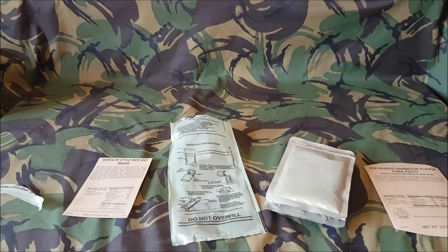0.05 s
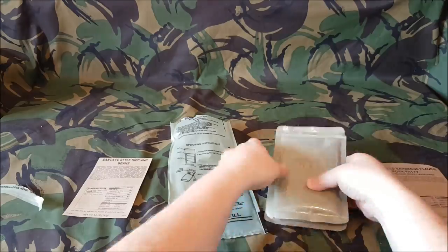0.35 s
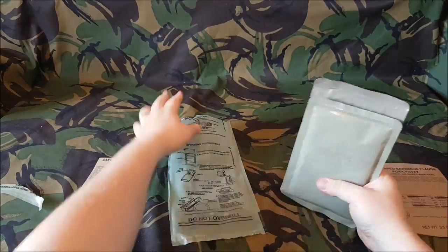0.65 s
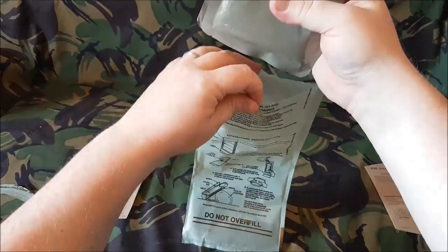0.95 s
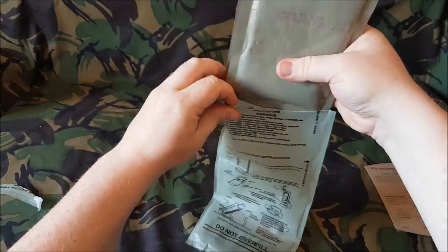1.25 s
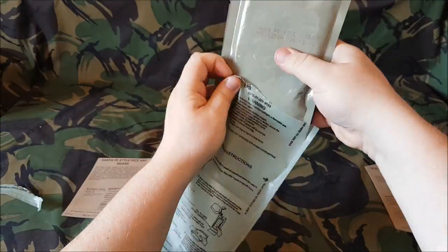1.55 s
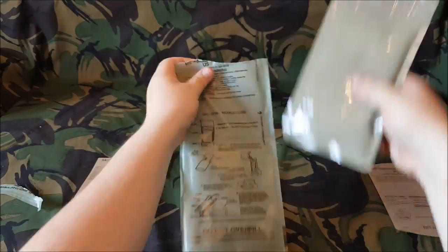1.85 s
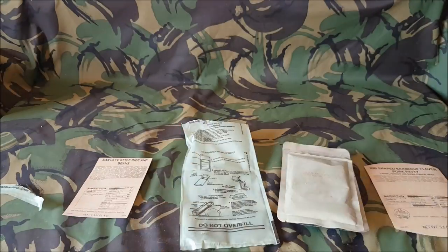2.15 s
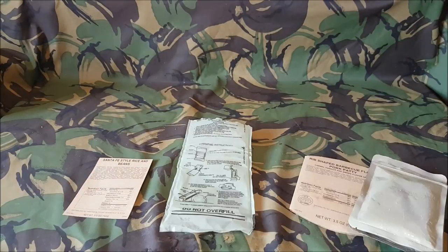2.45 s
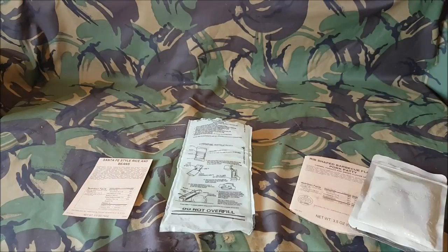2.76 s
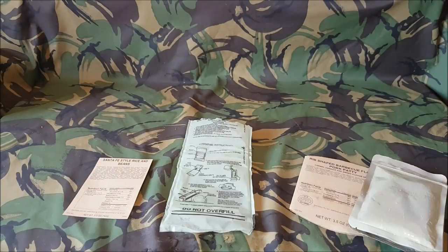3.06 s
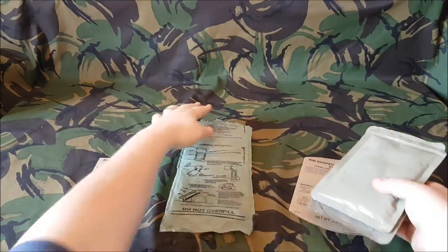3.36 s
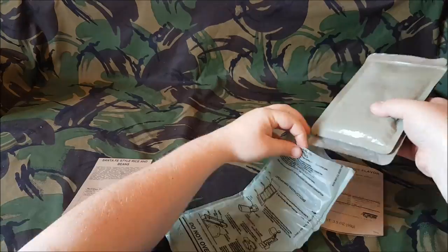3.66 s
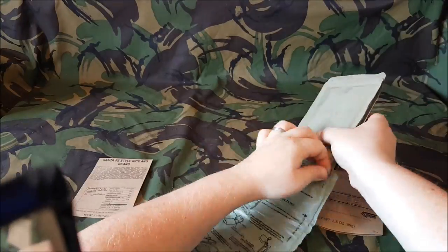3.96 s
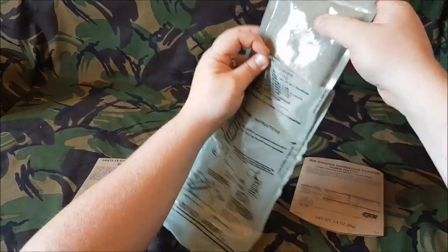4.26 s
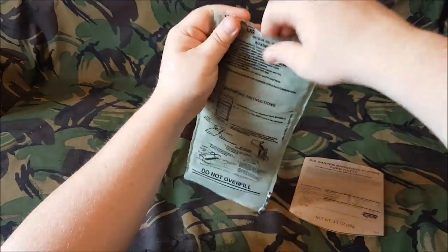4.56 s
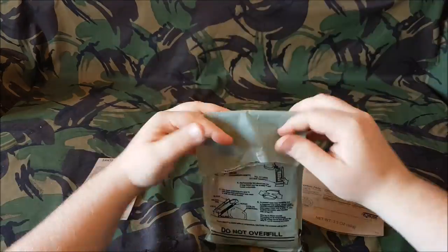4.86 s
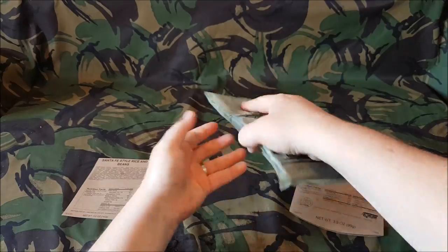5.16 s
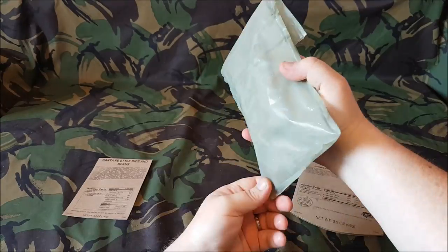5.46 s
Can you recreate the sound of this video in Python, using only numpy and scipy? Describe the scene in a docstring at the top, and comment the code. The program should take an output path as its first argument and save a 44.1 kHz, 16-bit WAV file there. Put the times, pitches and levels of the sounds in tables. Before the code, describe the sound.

A full foil food pouch knocks lightly on a cloth-covered table at about 0.2 seconds, swishes over the cloth and is tapped again as it is picked up around 0.5. From 0.7 to 2 seconds it is pushed into a thin plastic bag: a soft, bright rustle of tiny clicks, with short crumples and single snaps, strongest near 1.5. At 2.3 there is a soft dull bump, and the faint room hum drops abruptly to a quieter hiss. A few light crinkles and cloth swishes follow, then a near pause around 3 seconds. At 3.5 the crackling returns as the pouch is pushed in again. It is loudest and densest from about 4.1 to 5 seconds, surging as the bag is filled and folded. Last crumples come near 5.2 and fade by 5.5. Everything sounds close, in a small dry room.

```python
"""In a small dry room, at a cloth-covered table, a foil food pouch is picked up and pushed, twice, into a thin
plastic bag, which is then folded. The film buckles in tiny clicks: a soft rustle that surges with every push,
short crumples, and single snaps that each ring one facet. The full pouch knocks on the table and swishes over
the cloth. Underneath, the room tone hums faintly until 2.3 s, where a short low thump sounds and the background
drops abruptly to a quieter hiss."""
import sys
import numpy as np
from scipy import signal
from scipy.fft import rfft, irfft, next_fast_len
from scipy.io import wavfile
from scipy.ndimage import map_coordinates

SR = 44100
rng = np.random.default_rng(int(sys.argv[2]) if len(sys.argv) > 2 else 0)


def store_pcm(level_fs):
    """Save levels as 16-bit WAV."""
    pcm = np.round(np.clip(level_fs, -1, 1) * 32767).astype(np.int16)
    wavfile.write(sys.argv[1], SR, np.atleast_2d(pcm).T)


N = 243431
TIME = np.arange(N) / SR


# EQ curve of the thin film: f/Hz, level/dB
FILM_EQ = [(90, -32.5), (330, -14.5), (720, -5), (1150, -8), (1580, -2), (3900, -3.5), (7200, -1),
           (13000, -2), (16000, -14)]
def rustle(trims_db, slide_db, creases_db):
    """Film buckles under the fingers, with the odd sharper crease, over the hiss of sliding on foil."""
    slide = unit(colour(stereo_noise(N, 7300), FILM_EQ))
    creases = crackle(per_s=150, spread_db=2.4, cycles=2.6)
    buckling = crackle(per_s=600, spread_db=1, cycles=8.4)
    bunched = unit((buckling + undb(slide_db) * slide) * stick_slip(depth_db=5.3))
    bands = registers(bunched + undb(creases_db) * creases)
    gains = hand_effort()
    sound = sum(undb(db) * gain * band for db, gain, band in zip(trims_db, gains, bands))
    dull = shape(sound, lambda f: 1 / (1 + (f / 9820) ** 6))
    brightness = np.minimum(gains[-1] / undb(-59.5), 1) ** 0.166  # gentle handling loses the top
    return dull + brightness * (sound - dull)


# fader rides of the held film, one list a move (first push, laying down, filling and folding):
# t/s, treble level/dB, middle re treble/dB, body re middle/dB
HOLD_RIDES = [
    [(0.44, -75.5, 3.5, -9), (0.52, -66, -3, -4), (0.78, -73.5, 0.5, -3), (1.45, -65.5, -8, -2.5),
     (1.61, -78, 5.5, -6), (1.78, -70.5, -1, -0.5), (1.9, -72, -5.5, 1), (2.15, -66.5, -2.5, -4),
     (2.28, -85.5, 4.5, -10)],
    [(2.44, -69, 9.5, -21.5), (2.62, -88.5, -9, -24.5), (2.69, -81, -1, -2.5), (3.02, -73, -2.5, -3.5)],
    [(3.33, -73, 4.5, -24), (3.66, -56, -1, -24), (3.8, -60.5, -2, -9), (4.0, -63.5, 0, -11.5),
     (4.43, -64.5, -4.5, -4.5), (4.72, -46, -7, -4), (5.11, -68, 1.5, -9.5), (5.33, -62, -3, -10),
     (5.385, -76, -7, -2.5), (5.52, -70, -11, 3)],
]
# surges of a push or fold: t/s, length/s, treble level/dB, middle re treble/dB
PUSH_SURGES = [(0.826, 0.12, -62.5, -4.5), (1.013, 0.09, -67, -2), (1.172, 0.0406, -54.5, -2.5),
               (1.387, 0.057, -59.5, -2), (1.451, 0.1113, -49.5, -6), (1.64, 0.1386, -54.5, -3),
               (1.787, 0.0748, -61.5, -1.5), (2.061, 0.0575, -65.5, 2), (2.485, 0.1304, -60.5, -2),
               (3.656, 0.0232, -48, -6.5), (3.832, 0.0182, -51, -10.5), (4.053, 0.0544, -48.5, -8.5),
               (4.12, 0.15, -47, -6.5), (4.314, 0.0642, -41.5, -15), (4.48, 0.0767, -46, -9.5),
               (4.628, 0.0505, -49, -2), (4.755, 0.0716, -47, -5), (4.849, 0.17, -45.5, -12),
               (5.047, 0.0064, -42, -13.5), (5.171, 0.0473, -48.5, -10.5)]
def hand_effort(attack_s=0.0232, release_s=0.0131):
    """Body, middle and treble envelopes: each push rises, holds and lets go over the bed of holding."""
    times, *columns = np.concatenate(HOLD_RIDES).T
    hold_db, middle_db, body_db = (np.interp(TIME, times, column) for column in columns)
    held = sum((TIME > move[0][0]) & (TIME < move[-1][0]) for move in HOLD_RIDES)
    treble, middle = held * undb(hold_db), held * undb(hold_db + middle_db)
    for start, length_s, db, mid_db in PUSH_SURGES:
        attack = np.clip((TIME - start) / attack_s + .5, 0, 1)
        release = np.exp(-np.clip(TIME - start - length_s, 0, .5) / release_s)
        push = undb(db) * attack * release
        treble = np.hypot(treble, push)
        middle = np.hypot(middle, push * undb(mid_db))
    return middle * undb(body_db), middle, treble


# folds giving way: peak t/s, level/dB, middle re treble/dB, rise/ms
FOLD_CRUMPLES = [(0.001, -34, 1, 1.3), (0.258, -50, 10.5, 14.4), (0.498, -36.5, 2, 9.9),
                 (0.671, -30.5, -5, 4.46), (0.82, -34.5, -12, 3.2), (0.839, -36.5, -9, 3),
                 (0.902, -37.5, -7.5, 1.36), (0.948, -41.5, -6.5, 2.95), (1.057, -40.5, -10, 1.7),
                 (1.093, -38.5, -7.5, 8.9), (1.2, -35.5, -8.5, 14), (1.244, -35.5, -6.5, 3.6),
                 (1.278, -30, -8, 1.18), (1.512, -25.5, -5, 2.9), (1.721, -25, -5.5, 3.5),
                 (1.765, -42, -2, 3.6), (1.829, -37, -7.5, 1.17), (1.94, -34.5, -8.5, 0.51),
                 (1.973, -38.5, -4, 1.3), (2.013, -39.5, -0.5, 1.06), (2.429, -44.5, -2.5, 0.53),
                 (2.4449, -38, -21, 1), (2.537, -33.5, -17, 3.4), (2.57, -39, -6, 9),
                 (2.604, -46.5, -3, 2.4), (2.807, -44.5, -2, 1.18), (3.472, -27.5, -20.5, 3.33),
                 (3.52, -27, -18, 1.73), (3.582, -24.5, -19.5, 4.7), (3.834, -33.5, -5.5, 1.4),
                 (4.031, -29, -8.5, 2.55), (4.157, -19, -15.5, 3.12), (4.245, -28, -21.5, 0.98),
                 (4.334, -25, -6.5, 2.7), (4.459, -26.5, -11.5, 3.1), (4.505, -17, -15.5, 5.13),
                 (4.521, -23.5, -9.5, 7.1), (4.638, -22.5, -13.5, 13.6), (4.677, -19, -7.5, 12.3),
                 (4.76, -20, -15.5, 3.2), (4.812, -27.5, -8, 7.5), (4.885, -26, -13, 13.6),
                 (4.95, -23, -9, 2.86), (5.144, -24, -15, 9.16), (5.217, -26.5, -11, 15),
                 (5.259, -28, -10.5, 5.7), (5.361, -41.5, -6.5, 0.86)]
def crumples(trim_db, body_db, fall_s=0.00987):
    """A flurry of clicks swells as a fold is strained, peaks when it gives way and dies out."""
    body, middle, treble = registers(crackle(per_s=2200, spread_db=1.5, cycles=5.36))
    out = np.zeros((2, N))
    for s, db, mid_db, rise_ms in FOLD_CRUMPLES:
        peak = int(s * SR)
        span = slice(max(peak - SR // 20, 0), min(peak + SR // 10, N))
        t = TIME[span] - s
        swell = np.exp(np.minimum(1000 * t / rise_ms, -t / fall_s))
        flurry = treble[:, span] + undb(mid_db) * (middle[:, span] + undb(body_db) * body[:, span])
        out[:, span] += undb(db + trim_db) * swell * flurry
    return out


# accents from the stiffest creases: t/s, level/dB, ring f/Hz
CREASE_SNAPS = [(0.2793, -41, 9000), (0.5386, -32, 13500), (0.6713, -30, 2760), (0.8171, -32, 6460),
                (0.8376, -28.5, 10160), (0.9035, -33, 12320), (0.9252, -34, 5860), (0.9499, -31, 5250),
                (1.0942, -34, 8000), (1.2793, -22.5, 7750), (1.411, -33, 6000), (1.4312, -25, 11540),
                (1.4652, -25, 10250), (1.4725, -21.5, 8870), (1.4903, -19, 7580), (1.5096, -18.5, 6550),
                (1.531, -26, 6000), (1.535, -25, 5500), (1.5466, -22.5, 5680), (1.5573, -20.5, 5860),
                (1.649, -30, 5170), (1.7243, -25.5, 10080), (1.7665, -28, 11800), (1.8002, -34, 7000),
                (1.8116, -33, 6000), (1.8308, -25.5, 5860), (1.9411, -34, 9000), (1.9722, -27.5, 12660),
                (1.9859, -32, 8790), (2.0786, -39, 3500), (2.1184, -36, 10000), (2.4317, -36, 2580),
                (2.5704, -30, 7320), (2.572, -33, 1540), (2.6058, -33, 7410), (2.8079, -37.5, 3960),
                (2.9603, -42, 2250), (3.5173, -21.5, 11280), (3.5298, -22, 2580), (3.5469, -29, 10000),
                (3.5703, -20, 13440), (3.5824, -18.5, 5600), (3.5965, -25, 9220), (3.6209, -31, 11000),
                (3.6679, -26, 9910), (3.6929, -24, 12920), (3.8305, -30, 7060), (3.8807, -35, 6000),
                (3.9934, -29, 9910), (4.0303, -24.5, 11630), (4.0555, -25, 10000), (4.0806, -25, 9800),
                (4.1596, -15, 9910), (4.1752, -18, 8530), (4.2101, -21, 6980), (4.2225, -24, 8000),
                (4.2437, -18, 7490), (4.2504, -21, 9000), (4.2572, -17, 6980), (4.3229, -17, 5940),
                (4.3336, -17, 6800), (4.345, -19.5, 12230), (4.3565, -18.5, 12750), (4.3851, -22, 11800),
                (4.3923, -19, 11200), (4.4144, -24, 7920), (4.4587, -19, 10510), (4.5032, -12, 6290),
                (4.5141, -16, 13350), (4.528, -19, 5000), (4.5624, -27, 6600), (4.6145, -28, 8000),
                (4.6205, -23, 10000), (4.6731, -18.5, 5940), (4.7185, -22, 5900), (4.7854, -21, 5770),
                (4.8045, -19, 4000), (4.8102, -23, 1630), (4.8103, -18, 11800), (4.8164, -19, 11280),
                (4.8425, -23.5, 7580), (4.8544, -24.5, 7320), (4.8912, -23, 9000), (4.9015, -18.5, 6980),
                (4.9525, -22, 9990), (4.991, -23.5, 13870), (5.0478, -27, 9000), (5.0764, -31, 8000),
                (5.1233, -30, 9000), (5.1447, -17.5, 6290), (5.1702, -28, 7000), (5.1859, -27, 10590),
                (5.1968, -26, 7500), (5.2157, -23.5, 1550), (5.2244, -24, 12140), (5.3396, -37, 9000)]
def snaps(trim_db, low_cut_hz):
    """Stiff creases flip singly, each with its own pitch and pan, too small to radiate much bass."""
    out = np.zeros((2, N))
    for s, db, hz in CREASE_SNAPS:
        pan_db = rng.standard_normal() * np.array([[1], [-1]])
        click = facet(hz, cycles=4.8, focus=3.5)
        add(out, s, click * undb(db + trim_db + pan_db))
    return high_pass(colour(out, FILM_EQ), low_cut_hz, order=2)


def panels(trim_db, below_hz, ring_s):
    """The low snaps are wide panels popping through: a close pair of modes rings on, hollow."""
    out, t = np.zeros((2, N)), np.arange(SR // 20) / SR
    for s, db, hz in CREASE_SNAPS:
        if hz < below_hz:
            phase = 2 * np.pi * hz * t
            pair = np.sin(phase) + .5 * np.sin(phase * rng.uniform(1.07, 1.2))
            add(out, s, undb(db + trim_db) * pair * np.exp(-t / ring_s))
    return high_pass(out, 1000, order=4)


def facet(hz, cycles, focus, size=500):
    """One facet of film flips: a sharp crack and a ring at its pitch, briefer the smaller it is."""
    t, hz = np.arange(size) / SR, np.clip(hz, 1000, SR / 2.5)
    decay = np.exp(-t * hz / cycles) + .06 * np.exp(-t / .0025)
    crack = stereo_noise(size, 4500) * decay
    ring = signal.lfilter(*signal.iirpeak(hz, 2.6, fs=SR), crack)
    return np.array([unit(x) for x in crack + focus * ring]) / np.sqrt(size)  # unit energy


def crackle(per_s, spread_db, cycles, facets=90):
    """Facets of many sizes click at random times and uneven strengths, coloured by the film."""
    out = np.zeros((2, N))
    clicks_each = int(per_s / facets * N / SR)
    for hz in np.geomspace(1500, 13000, facets):
        click = facet(hz, cycles, focus=0.5)
        when, strength = rng.random((2000, 2))[:clicks_each].T
        gains = undb(spread_db * np.minimum(-np.log(1 - strength), 3))  # many soft, a few louder
        for s, gain in zip(when * N / SR, gains):
            add(out, s, gain * click)
    return unit(colour(out, FILM_EQ))


def stick_slip(depth_db, bunch_s=.004):
    """The film sticks and gives way: a fluttering gain that chops its clicks into bunches."""
    steps = TIME / bunch_s
    jitter = np.clip(rng.standard_normal(int(steps[-1]) + 2), -2, 1)
    return undb(depth_db * np.interp(steps, np.arange(len(jitter)), jitter))


def bending(x, depth_db, bands=18, step_s=.045):
    """As the bag changes shape its resonances wander: each band swells and fades on its own."""
    hz, times, spectrum = signal.stft(x, SR, nperseg=256)
    band = bands * np.log(np.clip(hz, 300, 16000) / 300) / np.log(16000 / 300)
    grid = np.meshgrid(band, times / step_s, indexing="ij")
    wander = map_coordinates(rng.standard_normal((bands + 1, 256)), grid, order=1, mode="nearest")
    return signal.istft(spectrum * undb(depth_db * wander), SR)[1][:, :N]


# modes of the table top under the pouch, and of the taut foil: f/Hz, level/dB, t60/s
TABLE_MODES = [(339, -14, 0.103), (495.8, -2, 0.0823), (868.4, -7.5, 0.08), (981, -12, 0.07),
               (1520, -25.5, 0.028), (1830, -5.5, 0.0157)]
FOIL_MODES = [(860, -5, 0.028), (1040, -3, 0.03), (1260, -3, 0.026), (1443, 1, 0.024), (2230, -4, 0.022),
              (2550, -8, 0.024), (3060, -12, 0.022), (3354, -9, 0.02)]
# the full pouch hits table or hand: t/s, thud level/dB, foil level/dB, contact/ms
POUCH_HITS = [(0.2112, -26.5, -38.5, 0.1525), (0.2576, -31, -41.5, 0.606), (0.455, -87, -57, 0.171),
              (0.494, -81.5, -48.5, 0.086), (0.4988, -69, -41.5, 0.103), (0.53, -44, -42.5, 0.27),
              (4.674, -45, -60.5, 0.19)]
def knocks(slap_db, rattle_db, low_cut_hz):
    """The pouch rings the table and its own foil, whose loose wrinkles rattle briefly."""
    out, t = np.zeros((2, N)), np.arange(SR // 4) / SR
    rattle_eq = [(500, -25), (1000, 0), (3200, -2), (8000, -20)]
    for s, thud_db, foil_db, contact_ms in POUCH_HITS:
        ring = ringing(FOIL_MODES, t * rng.uniform(0.871, 1.133))  # the tension varies from hit to hit
        slap = high_pass(stereo_noise(len(t), 4000) * np.exp(-t / .004), 800, order=2)
        rattle = unit(colour(stereo_noise(len(t), 4000), rattle_eq)) * np.exp(-t / .014)
        foil = ring + undb(slap_db) * slap + undb(rattle_db) * rattle
        hit = undb(thud_db) * ringing(TABLE_MODES, t) + undb(foil_db) * foil
        softness = np.exp(-1000 / (contact_ms * SR))  # a longer contact is duller
        add(out, s, signal.lfilter([1 - softness], [1, -softness], hit))
    return high_pass(out, low_cut_hz, order=4)


def ringing(modes, t):
    """Decaying modes of a struck thing; each hit lands elsewhere and weights them differently."""
    place_db = 1.5 * rng.standard_normal(len(modes))
    return sum(undb(db + extra_db) * np.sin(2 * np.pi * hz * t) * undb(-60 * t / t60_s)
               for (hz, db, t60_s), extra_db in zip(modes, place_db))


# short dull bumps: t/s, level/dB, start f/Hz, rise/s, pitch sag/octaves per rise time
DULL_BUMPS = [(0.035, -54.5, 877.3, 0.0052, 0.0015), (0.2114, -55, 197, 0.00264, 0.72),
              (0.32, -55, 899, 0.0035, 0.065), (0.534, -56.5, 394, 0.00148, 0.052),
              (0.547, -56.5, 274.5, 0.00514, 0.032), (0.579, -45, 513, 0.00165, 0.04),
              (1.766, -43.5, 770, 0.00164, 0.03), (2.094, -52.5, 735, 0.00593, 0.1296),
              (2.304, -39, 680, 0.000885, 0.717), (5.014, -52, 268.2, 0.0035, 0.018),
              (5.016, -53, 512.2, 0.0054, 0.032)]
def bumps(low_cut_hz):
    """Dull bumps of a few falling cycles; one lands where the room tone cuts to a quieter hiss."""
    out, t = np.zeros((2, N)), np.arange(SR // 20) / SR
    for s, db, hz, rise_s, sag in DULL_BUMPS:
        phase = 2 * np.pi * np.cumsum(hz * 2 ** (-sag * t / rise_s)) / SR
        swell = t / rise_s * np.exp(1 - t / rise_s)
        add(out, s, undb(db) * swell * np.sin(phase))
    return high_pass(out, low_cut_hz, order=2)


# pouch and hand drag over cloth and paper: t/s, length/s, level/dB, start f/Hz, end f/Hz, width/Hz
CLOTH_DRAGS = [(0.143, 0.289, -66, 5730, 4967, 280), (0.211, 0.254, -71, 8550, 7345, 4500),
               (0.249, 0.161, -63.5, 2483, 2797, 1600), (0.469, 0.0363, -57.5, 1901, 5042, 500),
               (0.717, 0.094, -69, 4700, 4423, 350), (2.055, 0.1304, -62.5, 3550, 4005, 450),
               (2.155, 0.126, -71.5, 5627, 5193, 320), (2.472, 0.1896, -61.5, 6113, 5240, 300),
               (2.524, 0.078, -63, 1750, 1538, 703), (2.817, 0.058, -63.5, 2250, 2263, 202),
               (3.316, 0.1194, -64, 2154, 2057, 398), (3.31, 0.1375, -65, 5176, 4883, 330)]
def scuffs(octave_db):
    """The ribs of the weave give a narrow, grainy swish and its octave; pitch follows the speed."""
    out = np.zeros((2, N))
    for s, length_s, db, start_hz, end_hz, width_hz in CLOTH_DRAGS:
        size = int(length_s * SR)
        phase = 2 * np.pi * np.cumsum(np.geomspace(start_hz, end_hz, size)) / SR
        grain = lambda width: shape(stereo_noise(size, 400), lambda f: 1 / (1 + (f / width) ** 2))
        swish = unit(grain(width_hz) * np.sin(phase))
        octave = unit(grain(2 * width_hz) * np.sin(2 * phase))
        add(out, s, undb(db) * np.sqrt(np.hanning(size)) * (swish + undb(octave_db) * octave))
    return out


# EQ curves of the room hiss, before and after the abrupt drop to a quieter hiss: f/Hz, level/dB
LOUDER_HISS_EQ = [(24, -62.5), (40, -21.5), (570, -16), (2200, -18), (6330, -21), (16000, -26)]
QUIETER_HISS_EQ = [(24, -38), (40, -13.5), (171, -25.5), (852, -23), (4930, -28.5), (16000, -37)]
# faint hum in the room: f/Hz, level/dB, entry t/s
HUM_TONES = [(100, -88, 0), (867, -77, 0), (455, -77.5, 2.03)]
def room_tone(louder_db, quieter_db, drop_s):
    """A bed of air with faint wavering tones drops abruptly to a quieter hiss."""
    hum = 0
    for hz, db, start in HUM_TONES:
        tone = unit(shape(rng.standard_normal(N), lambda f: 1 / (1 + ((f - hz) / 8) ** 2)))
        fade_in = np.clip((TIME - start) / 0.0068, 0, 1)
        hum = hum + undb(db) * tone * fade_in
    air = colour(stereo_noise(N, 380), LOUDER_HISS_EQ)
    air = shape(air, lambda f: (1 + f / 5000) ** -.6)  # far air is dull
    louder = undb(louder_db) * unit(air) + hum
    quieter = undb(quieter_db) * unit(colour(stereo_noise(N, 200), QUIETER_HISS_EQ))
    bed = np.where(TIME < drop_s, louder, quieter)
    return shape(bed, lambda f: 1 / (1 + (42 / f) ** 3))  # rumble cut


def reflections(x, early_db, tail_db, t60_s=.2):
    """The table throws sound straight back; the furnished room adds a weak, short tail."""
    t = np.arange(SR // 3) / SR
    early = stereo_noise(len(t), 3200) * np.exp(-t / 0.0054) * (t > .0012)
    tail = stereo_noise(len(t), 740) * undb(-60 * t / t60_s) * (t > .008)
    impulse = (undb(early_db) * unit(early) + undb(tail_db) * unit(tail)) / np.sqrt(len(t))
    return x + signal.oaconvolve(x, impulse, axes=1)[:, :N]


def registers(x):
    """Three-way crossover: body, middle and treble, each at an rms of one."""
    above_body = lambda f: 1 / (1 + (1200 / f) ** 4)
    treble = lambda f: 1 / (1 + (4000 / f) ** 6)
    body = lambda f: 1 - above_body(f)
    middle = lambda f: above_body(f) - treble(f)
    return [unit(shape(x, band)) for band in (body, middle, treble)]


def stereo_noise(size, apart_hz):
    """Noise that is centred in the bass and spreads wide above apart_hz."""
    mid, side = rng.standard_normal((2, size))
    side = shape(side, lambda f: 0.824 * f / np.hypot(f, apart_hz))
    return np.array([mid + side, mid - side])


def shape(x, gain):
    """Filter x by gain(Hz)."""
    size = x.shape[-1]
    padded = next_fast_len(2 * size if size < SR else size + SR // 10, real=True)
    hz = np.maximum(np.fft.rfftfreq(padded, 1 / SR), 1)
    return irfft(rfft(x, padded) * gain(hz), padded)[..., :size]


def colour(x, points):
    """EQ through points of f/Hz, level/dB."""
    hz, db = np.transpose(points)
    return shape(x, lambda f: undb(np.interp(np.log(f), np.log(hz), db)))


def high_pass(x, hz, order):
    """Cut the bass below hz."""
    return signal.sosfilt(signal.butter(order, hz, "high", fs=SR, output="sos"), x)


def add(out, s, sound):
    """Mix a sound in at time s; a mono sound sits in the centre."""
    i = max(int(s * SR), 0)
    out[:, i:i + sound.shape[-1]] += sound[..., :N - i]


def undb(db):
    """Decibels to gain."""
    return 10 ** (np.asarray(db) / 20)


def unit(x):
    """Scale to an rms of one."""
    return x / np.sqrt(np.mean(x ** 2))


def scene():
    """Film and hits on two buses over the room tone; the cloth keeps the knocks dry."""
    crinkle = rustle(trims_db=(0.5, 1.0, 0.6), slide_db=-7, creases_db=-1)  # trims: body, middle, treble
    crinkle += crumples(trim_db=-13.3, body_db=-10)
    film = bending(crinkle, depth_db=3.0)
    film += snaps(trim_db=8.0, low_cut_hz=916)
    film += panels(trim_db=-16, below_hz=3200, ring_s=0.0062)
    film += scuffs(octave_db=-12)
    hits = knocks(slap_db=17, rattle_db=1.5, low_cut_hz=339.5) + bumps(low_cut_hz=130.6)
    hits = reflections(hits, early_db=-15, tail_db=-23)
    film = reflections(film, early_db=-10.5, tail_db=-26)
    return film + hits + room_tone(louder_db=-70, quieter_db=-75, drop_s=2.303)


# colour of the two microphone ports: f/Hz, left minus right level/dB
PORT_BALANCE = [(100, 2), (300, 3.5), (1400, 1.5), (3000, 1.5), (5500, 4), (9000, 0), (13000, -4)]
def record(dry):
    """Two microphone ports of slightly different colour, then a steep top cut at 16 kHz."""
    ports = np.array([colour(channel, [(hz, sign * db / 2) for hz, db in PORT_BALANCE])
                      for channel, sign in zip(dry, (1, -1))])
    return signal.sosfilt(signal.ellip(8, .2, 70, 16000, fs=SR, output="sos"), ports)


dry = scene()
out = record(dry)
store_pcm(out)
```